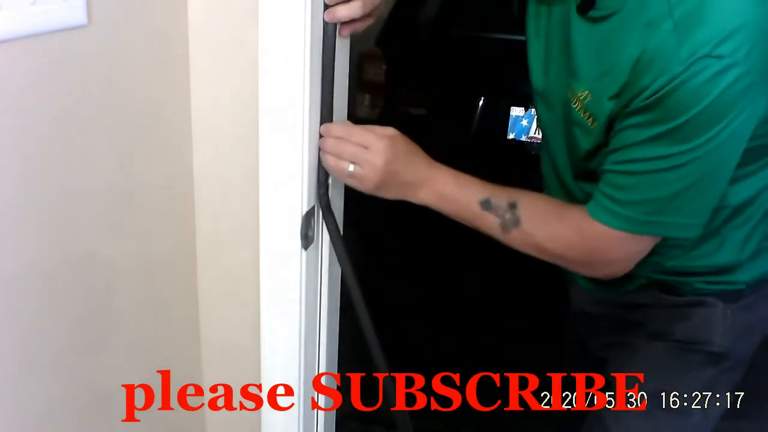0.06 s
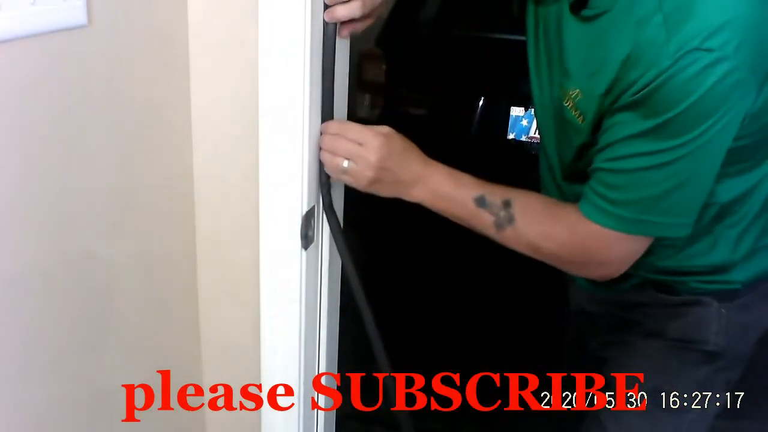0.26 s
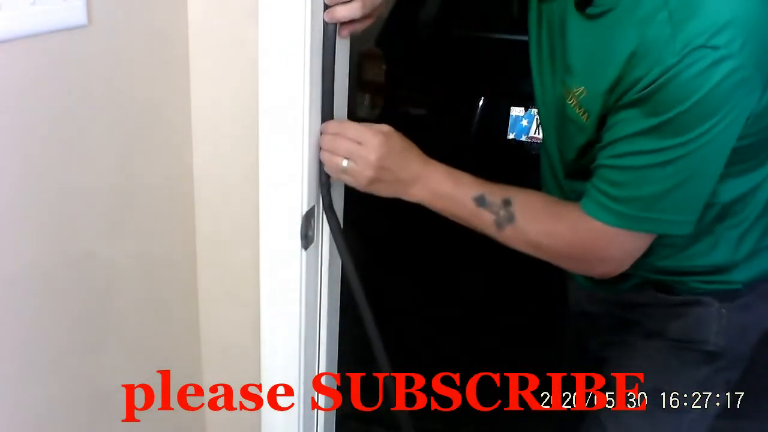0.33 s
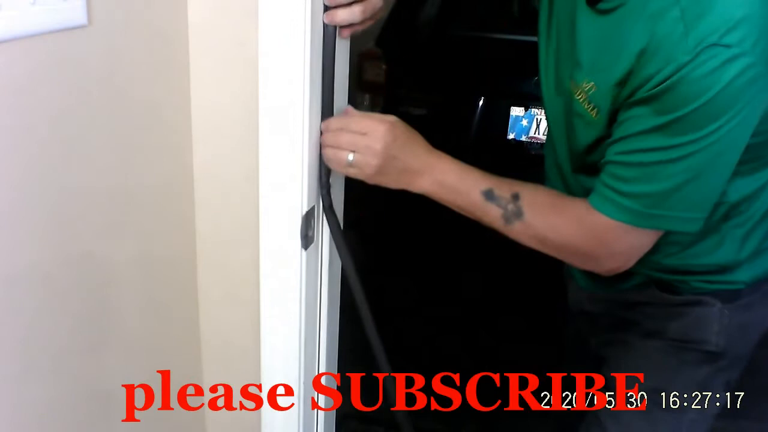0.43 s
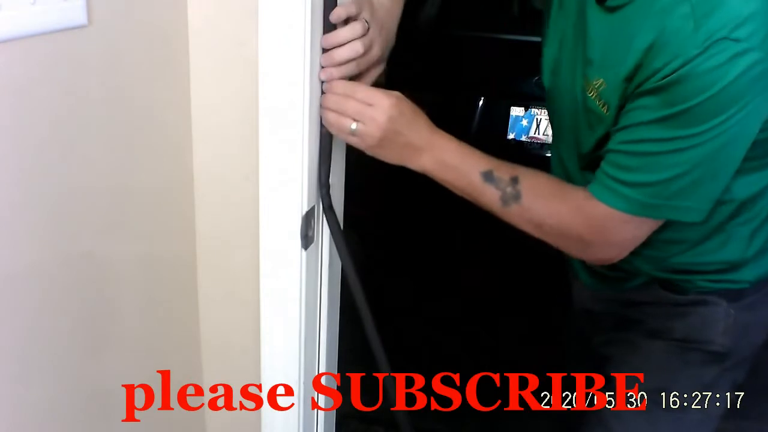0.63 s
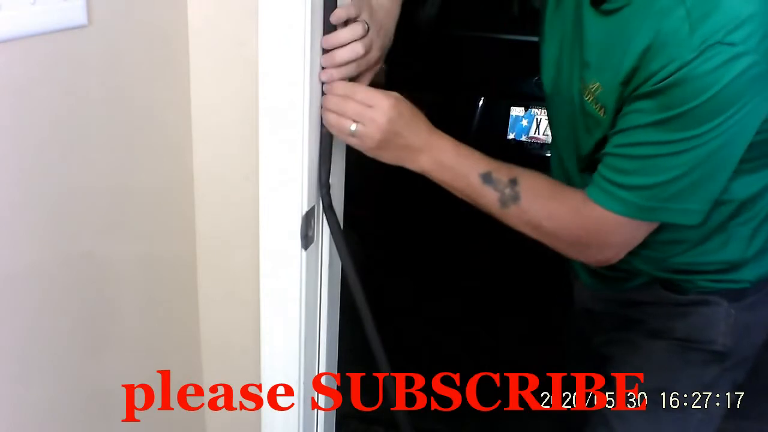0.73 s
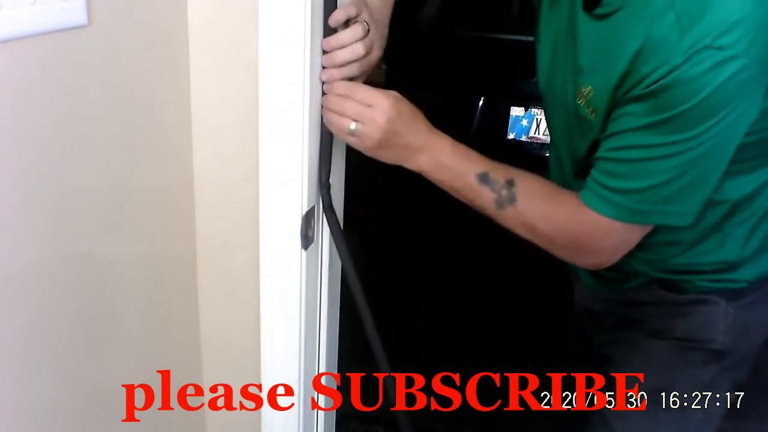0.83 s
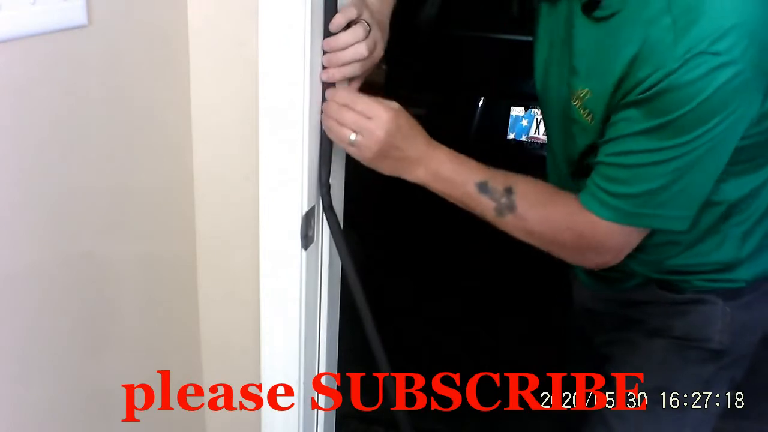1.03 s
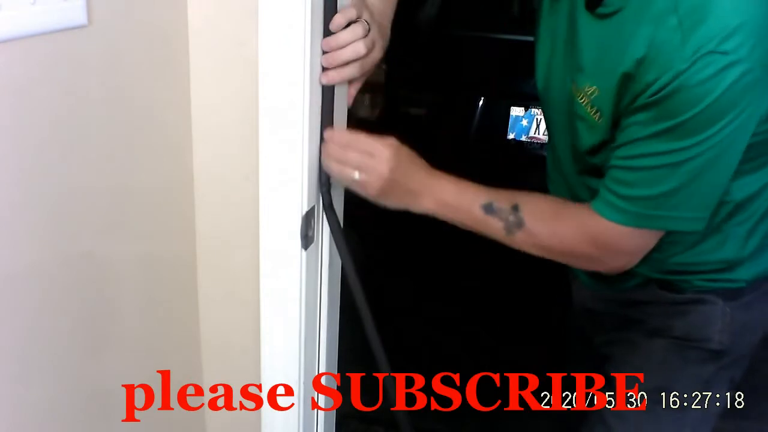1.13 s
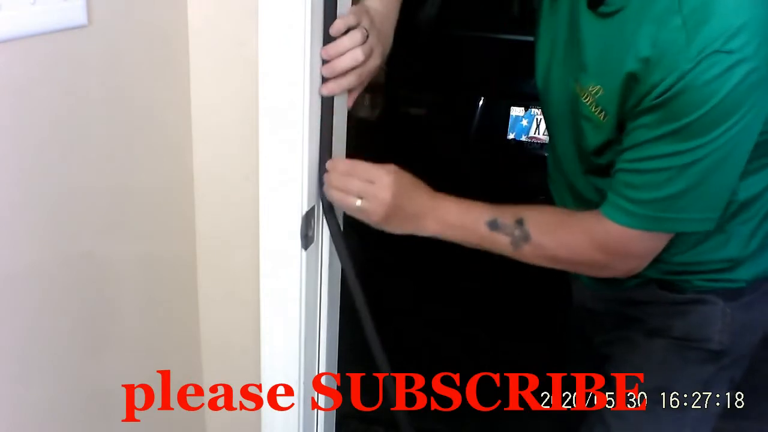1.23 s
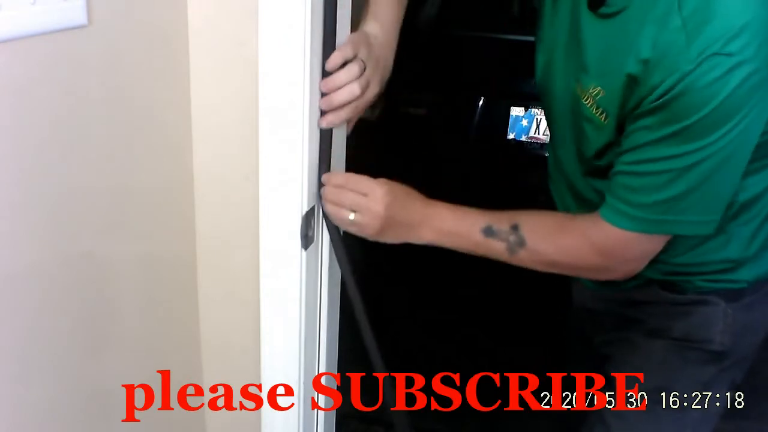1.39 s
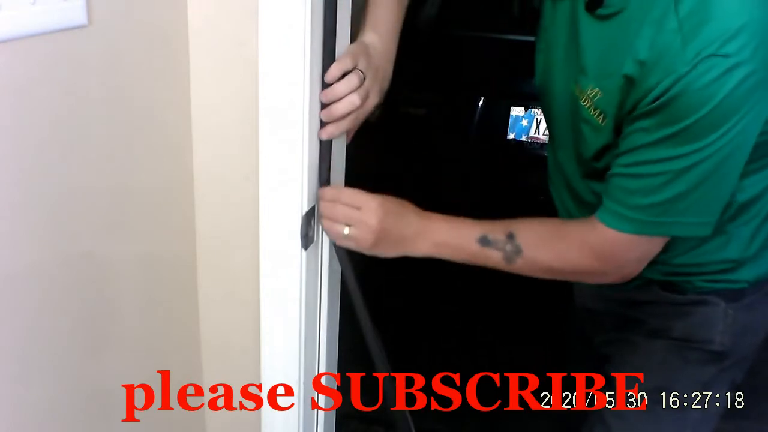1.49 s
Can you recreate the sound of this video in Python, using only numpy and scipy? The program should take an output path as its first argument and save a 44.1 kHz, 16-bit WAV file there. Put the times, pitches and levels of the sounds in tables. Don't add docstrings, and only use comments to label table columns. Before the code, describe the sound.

A plastic weather strip pops into a door frame with two quick hard snaps, the second louder, then two brief rasping, squeaky finger slides follow; close by in a small room, with faint microphone hiss.

```python
import sys
import numpy as np
from scipy import signal
from scipy.fft import rfft, irfft
from scipy.io import wavfile
from scipy.ndimage import map_coordinates

SR = 44100
rng = np.random.default_rng(int(sys.argv[2]) if len(sys.argv) > 2 else 0)


def store_pcm(level_fs):
    pcm = np.round(np.clip(level_fs, -1, 1) * 32767).astype(np.int16)
    wavfile.write(sys.argv[1], SR, np.atleast_2d(pcm).T)


def gain_from_db(level_db):
    decades = np.asarray(level_db, float) / 20
    return 10 ** decades


N = 68355
T = np.arange(N) / SR

# [f/Hz, level/dB per Hz]
HISS_COLOUR = [(15, -47), (25, 2), (179, -4), (339, -4), (409, 3), (467, -7.5), (1280, -25.5),
               (3530, -24.5), (14400, -31.5)]
# [t/s, level/dB]
RUB_LEVEL = [(0, -53), (.06, -60.5), (.13, -66), (.155, -56), (.2, -60.5), (.5, -61), (.512, -52),
             (.535, -51.5), (.544, -36.5), (.6, -43), (.72, -49.5), (.77, -59.5), (.86, -64.5), (.905, -58),
             (.94, -65), (1.125, -70.5), (1.135, -51.5), (1.195, -43.5), (1.3, -41), (1.34, -46.5),
             (1.45, -51), (1.55, -48)]
# [f/Hz, level/dB]
RUB_COLOUR = [(200, -19.5), (400, -8), (1000, -0.5), (2800, -3.5), (3500, -16.5), (4600, -8.5),
              (8000, -16.5), (14000, -21.5)]
# [t/s, peak level/dB, f/Hz, T60/s]
TICKS = [(0.148, -45, 1770, .012), (.149, -42, 490, 0.0093), (0.159, -48, 2200, 0.011),
         (0.163, -41.5, 1750, 0.0059), (0.427, -36, 1520, 0.0047), (0.5114, -33, 880, 0.0059),
         (.521, -35.5, 875, 0.0067), (0.538, -30.5, 1700, 0.014), (0.59, -40, 2640, 0.011),
         (0.603, -34, 1520, 0.014), (0.72, -54, 1570, 0.004), (1.216, -41, 1810, 0.016),
         (1.297, -48, 1610, 0.018), (1.3025, -32.5, 1530, 0.012), (0.9962, -45.5, 683, 0.026),
         (.998, -61, 940, 0.042), (1.130, -33, 694, 0.0095), (1.136, -31.5, 910, 0.0073),
         (1.1418, -47, 1140, .01), (1.1446, -45, 1300, 0.0085), (1.3445, -26.5, 2370, 0.0052),
         (1.472, -48.5, 1016, 0.032)]
# [t/s, peak level/dB, crack level/dB]
SNAPS = [
    (0.234, -12, -24),
    (0.2885, -5, -20.5),
]
# [f/Hz, level/dB, T60/s]
FRAME_MODES = [(444, -9.5, 0.024), (715, -7.5, 0.028), (1190, 3.5, 0.015), (1700, 5.5, 0.011),
               (2296, -3.5, 0.0093), (2883, -16, 0.011), (3950, -19, 0.021), (4490, -14, 0.019)]
# [f/Hz, level/dB]
CRACK_COLOUR = [(3000, -33.5), (4000, 3), (4800, -2), (5800, 3.5), (8500, -10)]
# [f/Hz, level/dB, T60/s]
CHATTER_MODES = [(850, -3, .03), (1010, -2, .025), (1220, 1, .06), (1600, -8, .02), (1900, -2, .02),
                 (2080, 0, .035), (2650, -6, .025)]
# [t/s, slip rate f/Hz, level/dB, jitter/share of rate]
SLIDES = [
    [(.555, 1100, -50, .07), (.58, 1020, -39, .06), (.6, 960, -43, .07), (.62, 870, -42, .03),
     (.637, 830, -41, .025), (.648, 780, -50, .04), (.69, 775, -48, .06), (.73, 770, -48, .07),
     (.75, 750, -62, .07)],
    [(1.176, 630, -50, .02), (1.191, 725, -34, .012), (1.2, 800, -46, .03), (1.208, 870, -36, .025),
     (1.226, 1025, -36, .02), (1.244, 1020, -32, .015), (1.265, 950, -39, .04), (1.303, 800, -46, .05),
     (1.32, 790, -60, .05)],
]
PARTIALS_DB = [
    [0, 0, -11, -22],
    [0, -6, -14, -24],
]
# [start t/s, end t/s, level/dB]
HALF_RATE = (.657, .745, -48)
# [t/s, level/dB, half length/s]
BRUSHES = [(0.868, -64.5, 0.0036), (.902, -65.5, 0.0067)]
# [f/Hz, level/dB]
BRUSH_COLOUR = [(3000, -30), (4500, 4), (8000, 7), (10000, -27.5)]
# [start t/s, end t/s]
TREBLE_GAPS = [(.131, .158), (.226, .322), (.485, .538), (1.121, 1.147)]
# [start t/s, end t/s]
BASS_ONLY = (.216, .2275)


def unit(x):
    return x / np.sqrt(np.mean(x ** 2))


def colour(x, points):
    hz, db = np.array(points).T
    f = np.arange(N // 2 + 1) * SR / N + 1
    gain = gain_from_db(np.interp(np.log(f), np.log(hz), db))
    return irfft(rfft(x) * gain, N)


def walk(rate_hz):
    values = rng.standard_normal(N // 20)
    return map_coordinates(values, [np.arange(N) * rate_hz / SR], order=3) * 1.1


def ring(at_s, hz, t60_s, phase, rise_s=0.00031):
    t = np.maximum(T - at_s, 0)
    decay = (T >= at_s) * np.exp(-np.log(1000) * t / t60_s)
    return decay * np.sin(2 * np.pi * hz * t + phase) * np.minimum(t / rise_s, 1)


def burst(at_s, t60_s):
    return ring(at_s, 0, t60_s, np.pi / 2)


def hiss():
    noise = unit(colour(rng.standard_normal(N), HISS_COLOUR))
    return noise * gain_from_db(-59 + 0.5 * walk(8))


def rub():
    grit_db, flicker_db = 2.5, -2.3
    grit = rng.standard_normal(N) * gain_from_db(grit_db * rng.exponential(size=N))
    rasp = colour(grit, RUB_COLOUR)
    out = 0
    for hz in 125 * 2 ** np.arange(8):
        octave = [(hz / 2, -40), (hz / 1.3, -3), (hz, 0), (hz * 1.3, -3), (hz * 2, -40)]
        out = out + colour(rasp, octave) * gain_from_db(flicker_db * walk(44.66))
    level_db = np.interp(T, *np.array(RUB_LEVEL).T)
    return unit(out) * gain_from_db(level_db + 0.5 * walk(90))


def room(x):
    t60_s, top_t60_s, top_db = 0.66, 0.45, -1
    gap_s, split_hz = 0.0033, 1110
    t = T[:SR // 2]
    noise = rng.standard_normal(len(t)) * np.clip(t / gap_s - 0.5, 0, 1)
    low = signal.sosfilt(signal.butter(2, split_hz, fs=SR, output="sos"), noise)
    decay = gain_from_db(-60 * t / t60_s)
    tail = low * decay + (noise - low) * gain_from_db(top_db - 60 * t / top_t60_s)
    tail = tail / np.sqrt(np.sum((noise * decay) ** 2))
    return signal.fftconvolve(x, tail)[:N] * gain_from_db(-7)


def ticks():
    rise_s = 0.0007
    out = 0
    for s, db, hz, t60_s in TICKS:
        knock = ring(s, hz, t60_s, 0, rise_s)
        knock = knock + 0.32 * ring(s, 1.516 * hz, 0.83 * t60_s, 0, rise_s)
        knock = knock + 0.088 * ring(s, 2.5 * hz, 0.96 * t60_s, 0)
        out = out + gain_from_db(db + 7.5) * knock
    return out


def snaps():
    out = 0
    for s, db, crack_db in SNAPS:
        hit = 0
        for k, (hz, mode_db, t60_s) in enumerate(FRAME_MODES):
            level_chance, pitch_chance = rng.standard_normal(2)
            pitch = hz * (1 + 0.0062 * pitch_chance)
            hit = hit + gain_from_db(mode_db + level_chance) * ring(s, pitch, t60_s, np.pi * (k % 2))
        crack = unit(colour(rng.standard_normal(N), CRACK_COLOUR)) * burst(s, 0.014)
        out = out + gain_from_db(db) * (hit / np.abs(hit).max() + gain_from_db(crack_db) * crack)
    return out


def chatter():
    start_s, t60_s, level_db, grit_db = 0.541, 0.16, -28.5, 3.7
    body = sum(gain_from_db(db) * ring(0, hz, mode_t60_s, 0) for hz, db, mode_t60_s in CHATTER_MODES)
    body = body[:SR // 10]
    grit = rng.standard_normal(N) * gain_from_db(grit_db * rng.exponential(size=N))
    grit = unit(grit) * burst(start_s, t60_s)
    return signal.fftconvolve(grit, body / np.sqrt(np.sum(body ** 2)))[:N] * gain_from_db(level_db)


def half_rate_slips(phase):
    start_s, end_s, level_db = HALF_RATE
    scatter_rad = 1.3
    second = np.cos(2 * np.pi * 910 * T + scatter_rad * walk(119.8))
    half = np.cos(phase / 2 + scatter_rad * walk(140))
    fade = np.clip(np.minimum(T - start_s, end_s - T) / 0.0096, 0, 1)
    return (half + second) * fade * gain_from_db(level_db + 2.2 * walk(120))


def squeaks():
    flutter_db, flutter_hz, wander_hz = 2.2, 120, 400
    rough, rough_hz = 12, 300
    out = 0
    for slide, partials in zip(SLIDES, PARTIALS_DB):
        s, hz, db, jitter = np.array(slide).T
        jitter_now = np.interp(T, s, jitter)
        rate = np.interp(T, s, hz) * (1 + jitter_now * walk(wander_hz))
        phase = 2 * np.pi * np.cumsum(rate) / SR
        tone = 0
        for k, partial_db in enumerate(partials):
            flutter = gain_from_db(partial_db + flutter_db * walk(flutter_hz))
            wobble = 1 + rough * jitter_now * walk(rough_hz)
            tone = tone + flutter * wobble * np.cos((k + 1) * phase)
        out = out + tone * gain_from_db(np.interp(T, s, db, left=-120, right=-120))
        if s[0] < HALF_RATE[0] < s[-1]:
            out = out + half_rate_slips(phase)
    return out


def brushes():
    shape = sum(gain_from_db(db) * np.exp(-((T - s) / half_s) ** 2) for s, db, half_s in BRUSHES)
    return shape * unit(colour(rng.standard_normal(N), BRUSH_COLOUR))


def scene():
    struck = colour(ticks() + snaps() + chatter(), [(80, -7.5), (300, 0.5)])
    near = struck + rub() + brushes()
    squeak = squeaks()
    return (near + squeak + room(near + 0.5 * squeak) + hiss())[None]


def drop(x, spans, hz):
    gate = sum(np.clip(np.minimum(T - a, b - T) / 0.003 + 0.5, 0, 1) for a, b in spans)
    return x - gate * colour(x, [(hz * 0.98, -90), (hz, 0)])


def top_cut(x):
    return signal.sosfilt(signal.butter(12, 14600, fs=SR, output="sos"), x)


def record(dry):
    x = drop(dry[0], TREBLE_GAPS, 8750)
    x = drop(x, [BASS_ONLY], 380)
    x = drop(x, [(-1, 9)], 14600)
    return top_cut(x[None])


dry = scene()
out = record(dry)
store_pcm(out)
```